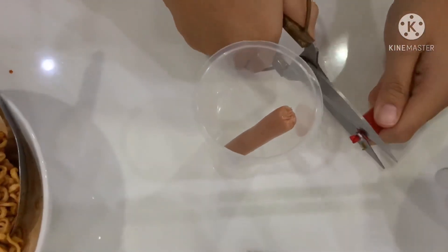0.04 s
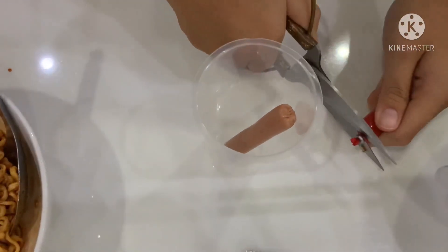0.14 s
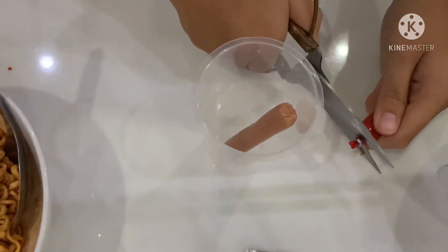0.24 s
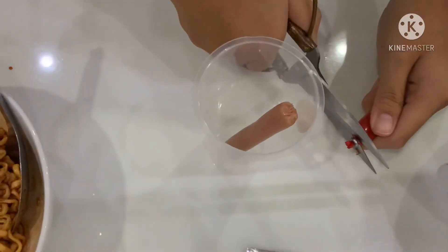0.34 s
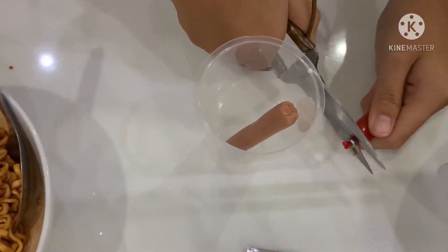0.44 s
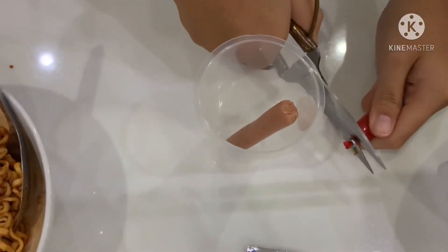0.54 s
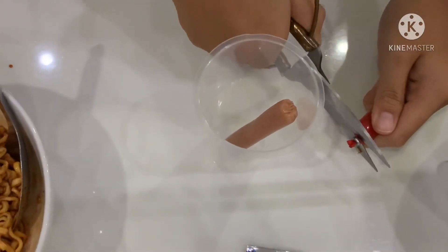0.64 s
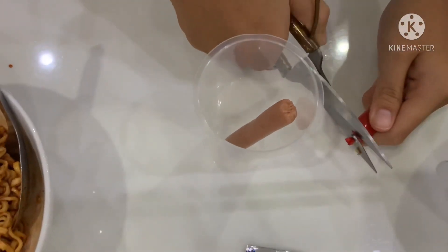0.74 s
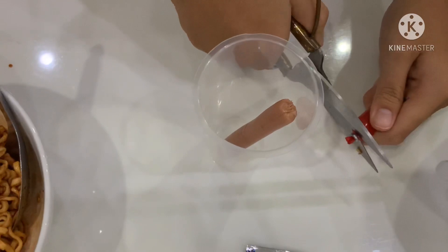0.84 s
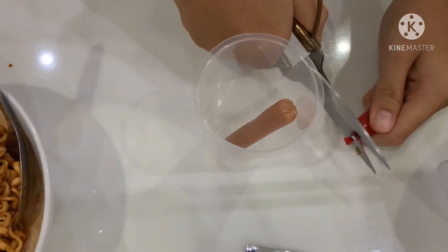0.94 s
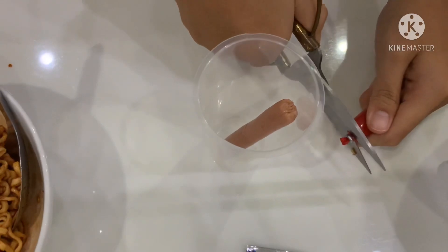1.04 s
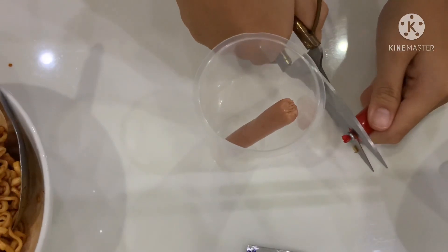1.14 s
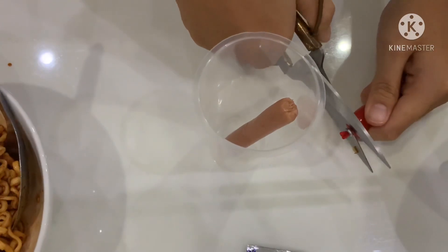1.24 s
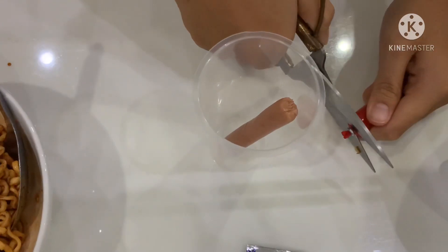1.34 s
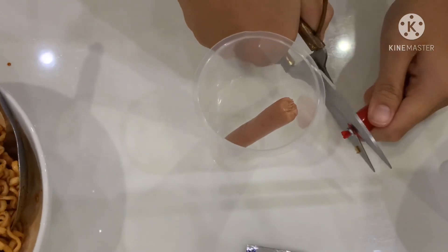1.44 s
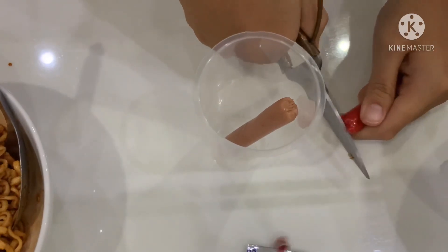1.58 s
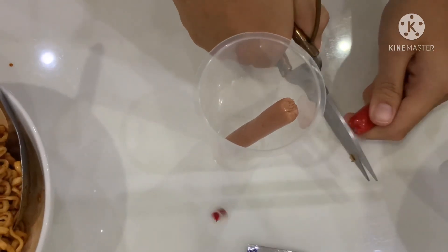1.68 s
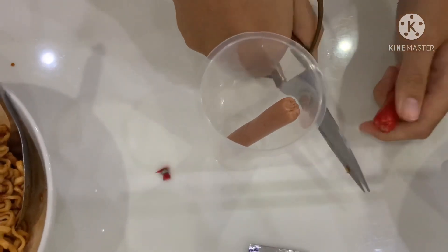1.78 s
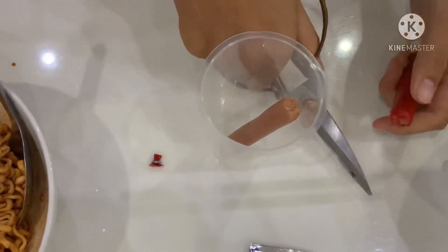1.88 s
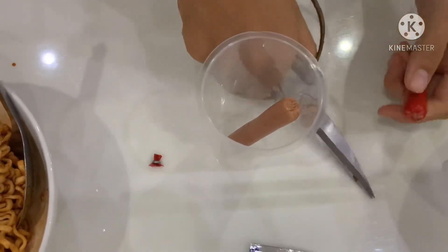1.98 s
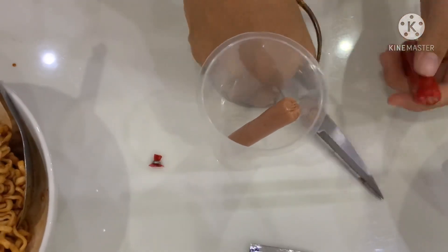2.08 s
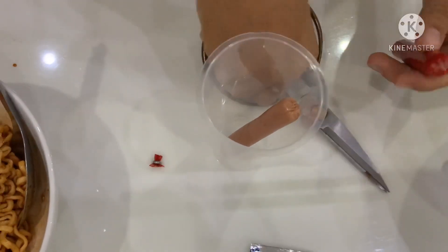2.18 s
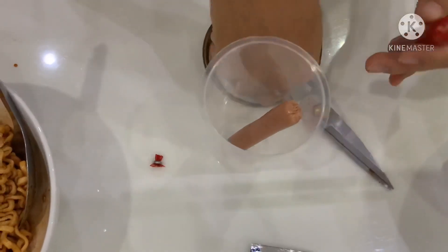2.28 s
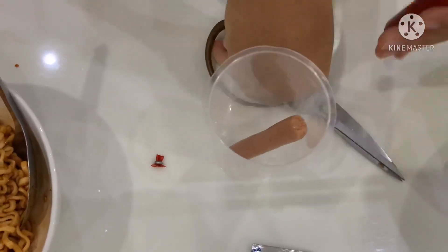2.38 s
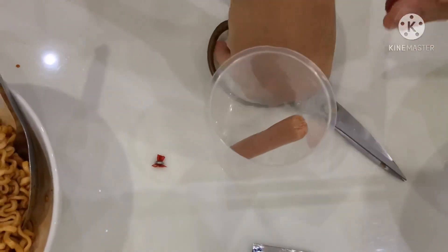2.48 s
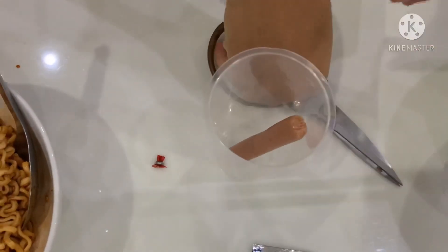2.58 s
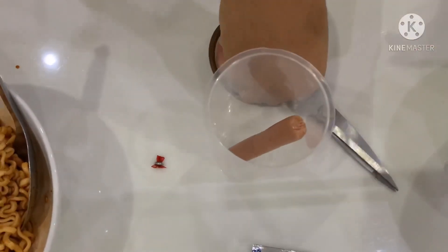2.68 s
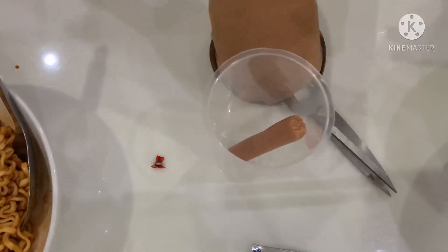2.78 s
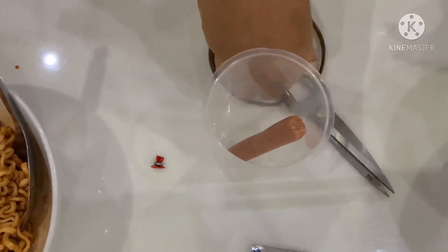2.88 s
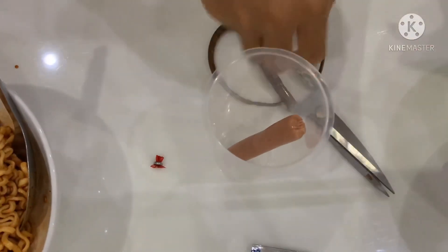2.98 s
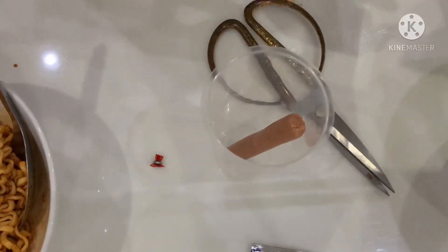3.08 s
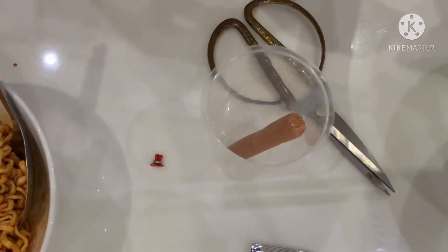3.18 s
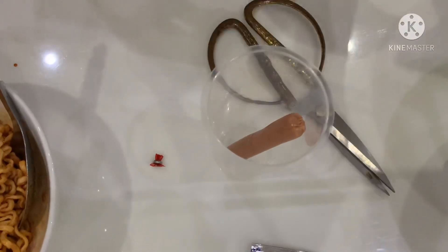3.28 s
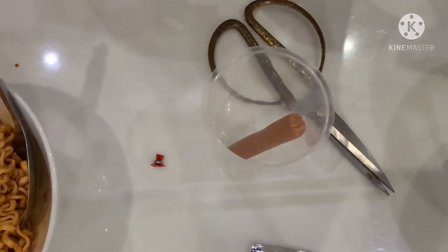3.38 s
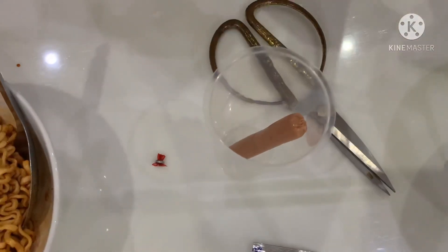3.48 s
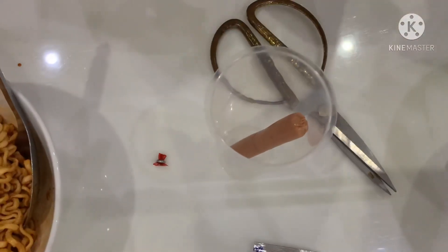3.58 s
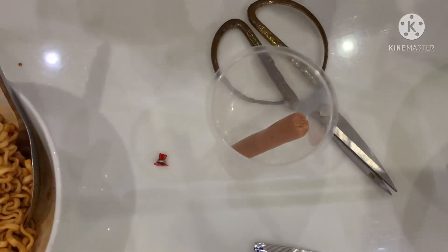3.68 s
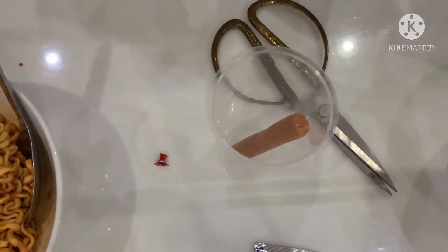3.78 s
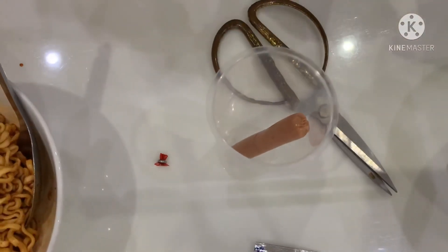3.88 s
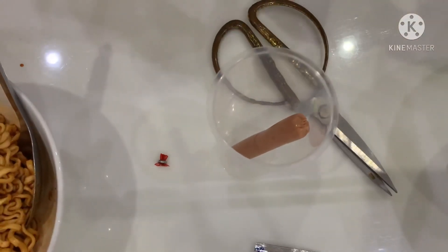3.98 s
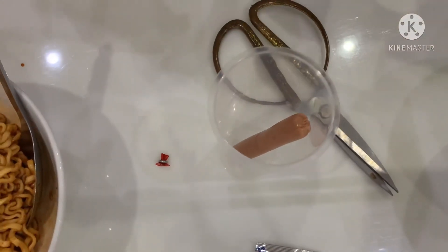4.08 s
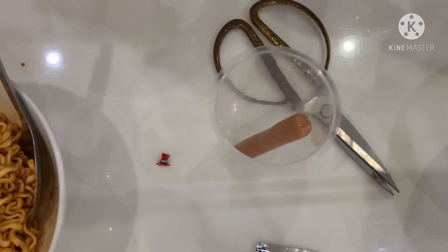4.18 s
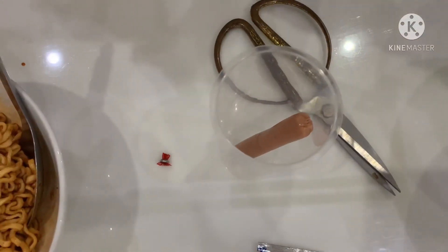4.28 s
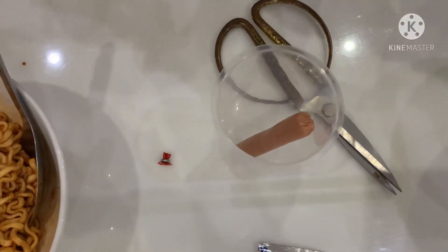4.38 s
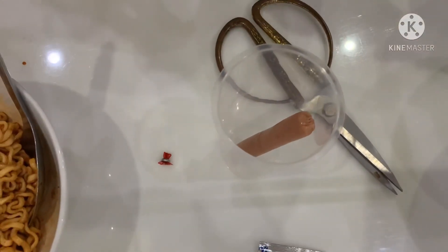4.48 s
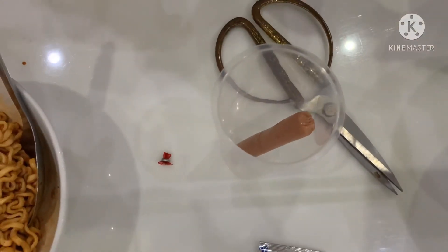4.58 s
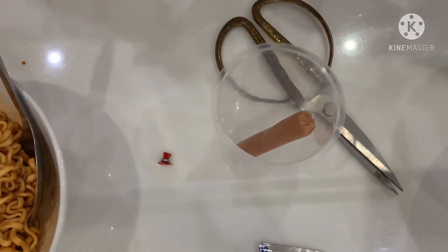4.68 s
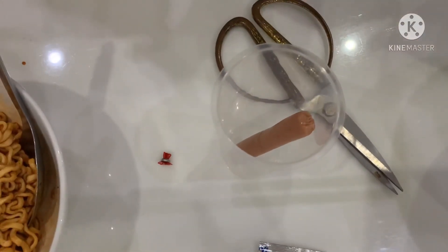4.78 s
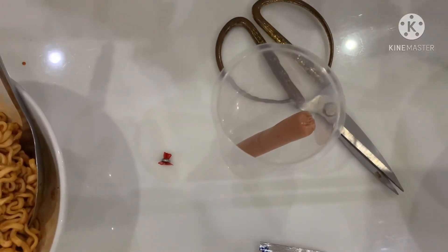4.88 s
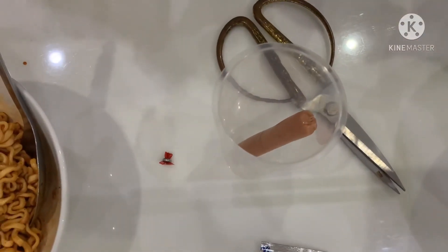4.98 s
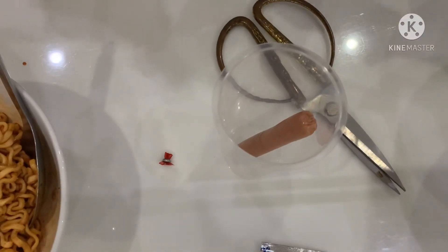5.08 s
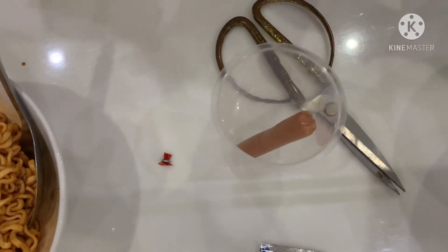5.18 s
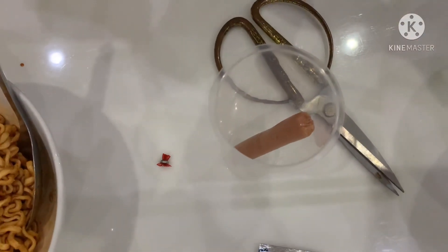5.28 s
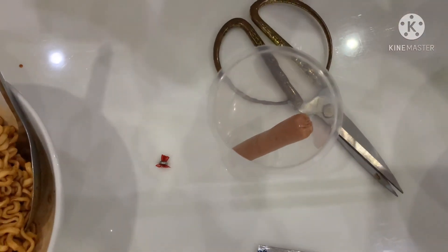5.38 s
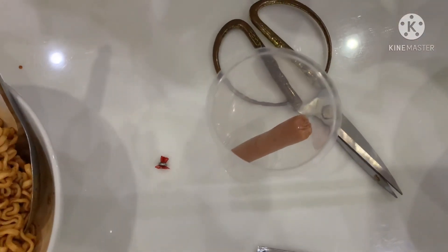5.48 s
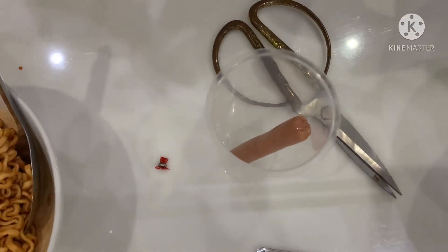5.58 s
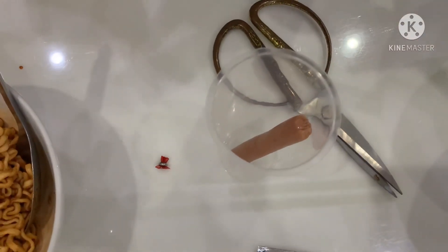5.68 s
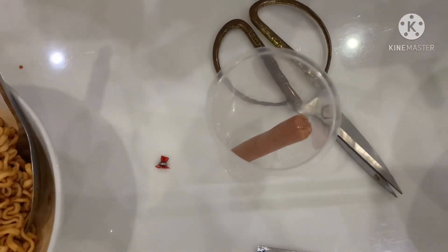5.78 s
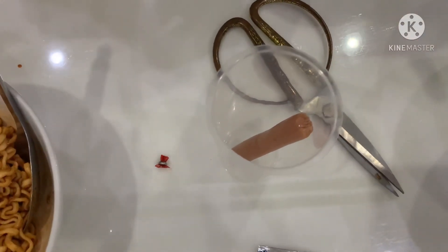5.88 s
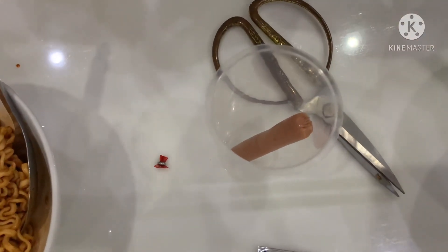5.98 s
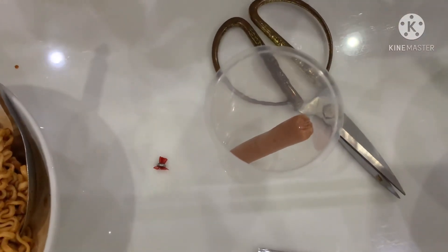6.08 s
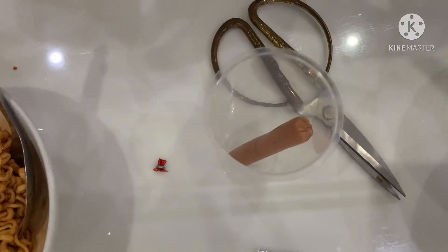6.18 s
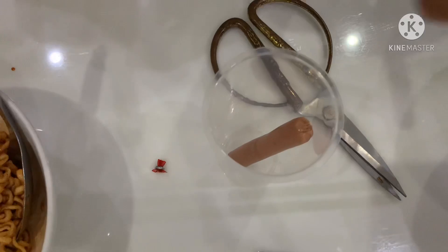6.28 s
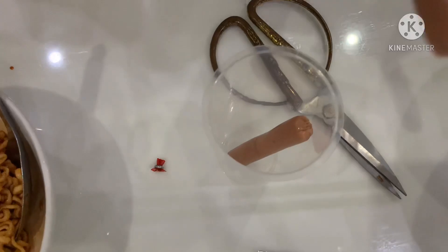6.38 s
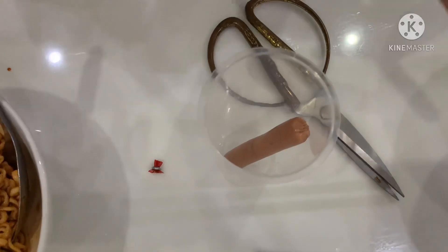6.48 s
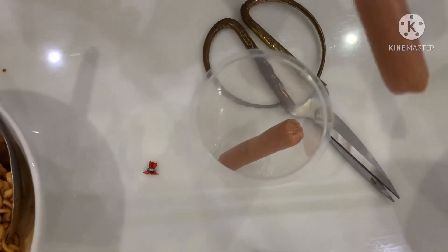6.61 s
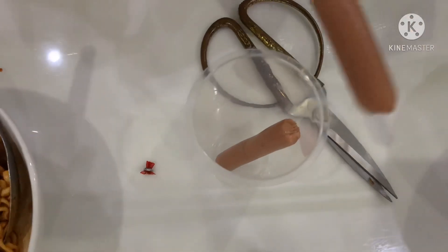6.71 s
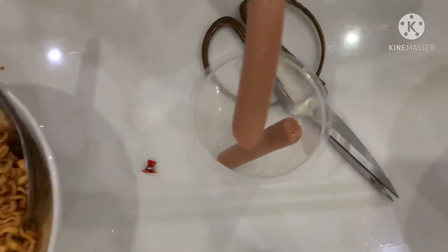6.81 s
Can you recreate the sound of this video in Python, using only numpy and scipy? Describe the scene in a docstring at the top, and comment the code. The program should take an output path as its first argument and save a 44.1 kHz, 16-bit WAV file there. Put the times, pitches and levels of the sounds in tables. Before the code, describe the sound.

Scissors shear a plastic sausage casing and snap shut, clatter loudly onto a stone table, then thin plastic wrapper crackles softly over an appliance hum.

```python
"""First an appliance hum and small close taps in a hard room, then a plastic wrapper rustling and crackling nearby.
Close to the microphone, steel scissors shear a plastic sausage casing, snap shut, touch the stone table, then
are dropped on it and clatter. Steel and stone are decaying modes with noise cracks; casing and wrapper are
coloured noise; sparse reflections make the room. Air, fan tones, hum and a rumble lie behind."""
import sys
import numpy as np
from scipy import signal
from scipy.fft import rfft, irfft, next_fast_len
from scipy.io import wavfile
from scipy.ndimage import uniform_filter1d

SR = 44100
rng = np.random.default_rng(int(sys.argv[2]) if len(sys.argv) > 2 else 0)


def transcribe(signal):
    """Save signal, clipped to [-1, 1], as a 16-bit WAV file at the path in sys.argv[1]."""
    frames = np.atleast_2d(signal).T
    limited = np.clip(frames, -1, 1)
    pcm = np.round(limited * 32767).astype(np.int16)
    wavfile.write(sys.argv[1], SR, pcm)


N = 301883  # samples


def scissors():
    """Steel close to the microphone: shearing, snips, the snap, then blades meeting the stone."""
    return shearing() + snips() + snap() + chatter() + clatter()


# Blades shearing the casing: t/s, level/dB
SHEAR_LEVEL = [(1.512, -58), (1.516, -47.5), (1.52, -26.5), (1.533, -39.5), (1.545, -58.5), (1.6, -56)]
# Spectrum of the shearing: f/Hz, relative level/dB per Hz
SHEAR_SPECTRUM = [(410, -53), (700, -19), (3240, -4.5), (4430, -4), (4730, -3), (5400, -12.5), (8530, -15),
                  (13900, -12), (16000, -21.5)]


def shearing():
    """Sliding edges make a continuous coloured noise under a level curve."""
    out = np.zeros(N)
    add(out, *played(SHEAR_LEVEL, lambda n: shaped(rng.standard_normal(n), SHEAR_SPECTRUM)))
    return out


# Casing fibres parting: t/s, relative level/dB, centre f/Hz, width/octaves, treble skirt/dB, t60/s
FIBRE_SNIPS = [(1.551, -29.5, 1290, 0.91, -21, 0.05), (1.6156, -18, 4080, 0.34, -37, 0.01215),
               (1.6273, -18, 3700, 0.38, -54, .012), (1.6462, -21.5, 4290, .3, -26, .016),
               (1.7166, -19.5, 5557, 4.6, -32, .009), (1.751, -29.5, 9000, 1.477, -2, 0.011),
               (1.762, -36, 10000, 1.1, -14, .009), (1.799, -44, 9000, 1.2, -18, 0.0068),
               (1.8238, -29.5, 13500, 0.61, -7, .009)]


def snips():
    """Each parting fibre is a tiny snap of noise."""
    out = np.zeros(N)
    for s, *row in FIBRE_SNIPS:
        add(out, s, tick(*row))
    return out


# The blades close: t/s, relative level/dB
BLADE_SNAP = [(1.8664, -5)]
# Modes of the scissors held in the air: f/Hz, relative level/dB, t60/s
HELD_MODES = [(1953, -17.5, 0.024), (2800, -17.5, 0.035), (4370, -4, .008), (4900, -4.5, .008),
              (7040, -5, 0.028), (7400, -4.5, .012), (8000, -7, .008), (9200, 2.5, 0.016),
              (10600, 7.5, 0.021), (10790, -27.5, 0.7), (11400, -4.5, .01), (13510, -4.5, 0.0092),
              (15170, 5, 0.02)]


def snap():
    """Closing blades ring at their modes, with a bright puff of contact noise."""
    out = np.zeros(N)
    for s, db in BLADE_SNAP:
        add(out, s, amp(db - 10.5) * ring(HELD_MODES, spread_db=0, detune=0))
        contact = burst(0.017, [(1200, -41.5), (2200, -13), (7500, 13), (16000, 4)])
        add(out, s, amp(db - 16.5) * contact)
    return out


# Loose blades on the stone between the blows: t/s, level/dB
CHATTER_LEVEL = [(2.786, -29.5), (2.84, -23), (2.9, -36.5), (2.93, -36.5), (2.94, -24), (2.99, -34.5),
                 (3.04, -67)]
# Spectrum of the chatter: f/Hz, relative level/dB per Hz
CHATTER_SPECTRUM = [(180, -45), (300, -10), (701, -6), (930, -6), (1720, -9.5), (3130, -6.5), (8220, -23.5),
                    (13100, -25), (16000, -32)]


def chatter():
    """Loose blades chatter as grainy coloured noise."""
    out = np.zeros(N)
    add(out, *played(CHATTER_LEVEL, lambda n: shaped(grains(n, 5.2), CHATTER_SPECTRUM)))
    return out


# Blows on the table: t/s, blow level/dB, then relative: table thud/dB, handles/dB, brightness/dB, ring/dB
BLOWS = [(1.991, -19.5, -5, -3.5, -7.5, -13.5), (2.0187, -23, -3, -11.5, -0.5, -12.5),
         (2.036, -20.5, -19.5, 0, -2.5, -20), (2.0519, -35.5, -16, -7.5, -19, -2),
         (2.7857, -18, -17, -9.5, -15, -9.5), (2.7959, -10, -4, -20.5, -12.5, -6.5),
         (2.8032, -15.5, -14.5, -6, -5, -9.5), (2.8124, -9.5, -9.5, -8.5, 6.5, -14),
         (2.8215, -35.5, -2, -8, -7, -17.5), (2.8357, -16, -16, 3, -9.5, -15.5),
         (2.8432, -10, -26, -4, -4, -17.5), (2.863, -23.5, -15.5, -5.5, -8.5, -13.5),
         (2.881, -33.5, 13.5, 7.5, 13, -11.5), (2.8985, -41, -5, 15.5, 13, -15),
         (2.9322, -2.5, -15, -18.5, 0.5, -15.5), (2.9468, -14, -7, -13.5, -5.5, -16.5),
         (2.965, -15, -7.5, -3, -14, -25)]


def clatter():
    """The scissors touch the table, then drop and bounce: one knock for each contact."""
    out = np.zeros(N)
    for s, *row in BLOWS:
        add(out, s, knock(*row))
    return out


# Modes of the scissors against the stone: nominal f/Hz, relative level/dB, t60/s
LYING_MODES = [(539.5, 4.5, 0.032), (772, -10.5, 0.06), (850, -8, 0.084), (942, -4, 0.05),
               (1002, -10.5, .05), (1234, -15.5, 0.094), (1395, -13.5, 0.08), (1842, 0, 0.038),
               (2030, -4.5, 0.022), (2210, -4, 0.047), (3090, 4, 0.045), (3425, 0, 0.03), (3630, -0.5, .03),
               (3947, -3.5, 0.063), (4306, -3, 0.059), (4830, -6, 0.055), (5430, -7, 0.085),
               (6620, -7, 0.12), (6980, -3.5, 0.048), (7430, -12.5, .1), (8980, -17.5, 0.25),
               (10250, -20, .25), (10720, -6.5, 0.03), (11350, -3.5, 0.03), (11770, -17.5, .25),
               (12750, 2.5, 0.028), (12720, -18, .25), (13850, -3, .02), (15200, -0.5, .04),
               (14500, -21, 0.25)]
# Modes of the table top: nominal f/Hz, relative level/dB, t60/s
TABLE_MODES = [(62, -18.5, 0.11), (109.6, 3.5, 0.04), (185.7, -9.5, 0.34), (285, -4, 0.059),
               (388.7, -3, 0.03)]
CRACK_T60_S = 0.026
BLADE_SHARE = 0.33  # the blades brighten less than their tips


def knock(db, thud_db, handles_db, bright_db, ring_db):
    """Contact crack, ringing steel damped by the stone, and the thud of the table."""
    colour = [(150, thud_db + 4.5), (400, handles_db - 10), (950, handles_db + 12), (3500, 0),
              (7300, BLADE_SHARE * bright_db + 3), (12500, bright_db + 3), (16500, bright_db + 3.5)]
    hz, weight_db = np.transpose(colour)
    mode_hz = np.array(LYING_MODES)[:, :1]
    choke_db = 1.3 * np.log2(mode_hz / 1000)  # the stone chokes high modes more
    steel = ring(LYING_MODES, np.interp(np.log(mode_hz), np.log(hz), weight_db) - choke_db)
    onset = 1 - np.exp(-np.arange(len(steel)) / SR / 0.003)  # the heavy top answers slowly
    table = ring(TABLE_MODES, spread_db=1.5) * onset
    out = amp(ring_db) * steel + amp(thud_db - 6.5) * table
    add(out, 0, amp(-6) * burst(CRACK_T60_S, colour))
    return amp(db) * out


def wrapper():
    """Plastic nearby, with taps close by: crackles, grainy rustle and faint rubbing whistles."""
    return taps() + crackles() + rustle() + rub() + squeak()


# Small taps close by: t/s, relative level/dB, centre f/Hz, width/octaves, treble skirt/dB, t60/s
CLOSE_TAPS = [(0.1121, -24, 990, 0.68, -30.5, 0.1), (0.1123, -28, 6470, 0.27, -54, 0.038),
              (.227, -41.5, 4900, 0.79, -26, 0.0091), (2.3, -36, 775, .2, -44.5, 0.044),
              (4.057, -35, 5220, 1.5, -14, 0.028), (4.625, -38, 5050, 0.74, -21, 0.077),
              (4.961, -30, 5800, 4.2, -14, 0.058), (5.304, -47, 3504, 0.78, -25, 0.029),
              (5.420, -40.5, 4200, 1, -26, 0.028), (5.95, -34.5, 2944, 0.33, -53, 0.017)]


def taps():
    """Each tap is a short puff of noise around one broad resonance."""
    out = np.zeros(N)
    for s, *row in CLOSE_TAPS:
        add(out, s, tick(*row))
    return out


# Distinct wrapper crackles: t/s, relative level/dB, centre f/Hz
WRAPPER_CRACKLES = [(1.377, -49.5, 11040), (3.4815, -42, 14900), (3.596, -53, 7120), (3.655, -46, 7340),
                    (3.8546, -51, 15000), (3.9666, -49.5, 9670), (4.2018, -51, 11000),
                    (4.4707, -52.5, 9100), (4.4836, -47, 8990), (4.5516, -52, 10100), (4.6628, -47, 7196),
                    (5.0499, -46, 10400), (5.1165, -45, 7350), (5.257, -44.5, 13600), (5.4774, -44, 12600),
                    (5.51, -42, 10050), (5.8664, -55, 13330), (6.0555, -43, 9700), (6.0693, -42, 13100),
                    (6.284, -39, 12750), (6.372, -49, 9060), (6.4815, -47, 12550), (6.525, -38.5, 8840),
                    (6.6794, -53, 11600), (6.6954, -50, 9610)]
# Shape of every crackle: width/octaves, treble skirt/dB, t60/s
CRACKLE_SHAPE = (2.3, -16, .015)
FAINT_PER_S, FAINT_FROM_S = 4, 3.5  # faint crackles at random once the wrapper is being peeled
FAINT_DB = -58  # lowest relative level


def crackles():
    """Each crackle is a tiny wide-band snap; faint ones fall at random in even time slots."""
    out = np.zeros(N)
    for s, *row in WRAPPER_CRACKLES:
        add(out, s, tick(*row, *CRACKLE_SHAPE))
    for k, (late, size, pitch) in enumerate(rng.random((14, 3))):
        faint = tick(FAINT_DB + 5 * size, 7000 * 2 ** pitch, *CRACKLE_SHAPE)
        add(out, FAINT_FROM_S + (k + late) / FAINT_PER_S, faint)
    return out


# Fingers and wrapper rustling: peak t/s, peak level/dB, rise/s, fall/s
RUSTLES = [(.2, -72, 0.086, 0.32), (.734, -64, 0.034, .08), (1.046, -64, .045, 0.065),
           (1.214, -55, 0.075, 0.25), (1.497, -63, 0.12, 0.085), (1.864, -48.5, .05, .01),
           (2.354, -59, 0.17, .11), (2.6, -73.5, .04, 0.25), (3.5, -72, 0.044, .1), (3.675, -65, .07, .04),
           (4.062, -56, .006, 0.048), (4.119, -68, .08, .4), (4.49, -59, .045, 0.046),
           (4.63, -61, 0.033, .07), (4.959, -43, 0.013, .05), (5.001, -63.5, 0.083, .5),
           (5.27, -65.5, .5, .15), (5.421, -64, .15, .1), (5.52, -61, 0.13, 0.11),
           (5.67, -69.5, 0.13, 0.48), (6.07, -63.5, .13, .07), (6.28, -64, 0.021, .2), (6.4, -69, .2, 0.13),
           (6.48, -66, 0.033, .2), (6.53, -63, 0.025, 0.09), (6.84, -69, 0.43, .05)]
# Steady handling under the rustles, running past the end: from t/s, to t/s, level/dB
HANDLING = (2.7, 9.5, -81)
# Spectrum of both: f/Hz, relative level/dB per Hz
RUSTLE_SPECTRUM = [(1500, -30.5), (2500, -1.5), (4500, 1.5), (7000, -2.5), (10000, -4.5), (13500, -4.5),
                   (16000, -8.5)]


def rustle():
    """Moving plastic is grainy coloured noise, swelling with each gesture over steady handling."""
    out = np.zeros(N)
    for rows in [swell(*row) for row in RUSTLES] + [held(*HANDLING)]:
        add(out, *played(rows, lambda n: shaped(grains(n, 1.7), RUSTLE_SPECTRUM)))
    return out


# Plastic rubbed until it whistles: peak t/s, peak level/dB, rise/s, fall/s, tilt/dB per octave
RUBS = [(4.066, -52.5, .006, .02, -3), (4.111, -57, 0.054, 0.36, 0), (4.31, -51.5, 0.19, .11, -3),
        (4.39, -56.5, .2, .25, -23), (4.88, -64, 0.046, 0.23, 33), (4.95, -53, 0.091, 0.012, 12)]
# Resonances of the rubbed plastic: f/Hz, width/Hz, relative level/dB before the tilt
RUB_PEAKS = [(2940, 380, -1.5), (4310, 110, 3), (5220, 58, 1.5), (6700, 550, -7.5)]


def rub():
    """Rubbed plastic whistles faintly: narrow noise bands with an unsteady level."""
    out = np.zeros(N)
    for *row, tilt_db in RUBS:
        def whistling(n):
            return rubbing(n, RUB_PEAKS, tilt_db) * amp(2.2 * wander(n, 300))
        add(out, *played(swell(*row), whistling))
    return out


# A thin whistle grows at the end: t/s, level/dB
SQUEAK_LEVEL = [(6.7, -70), (6.77, -65.5), (6.85, -52.5)]
# Resonances of the whistle: f/Hz, width/Hz, relative level/dB
SQUEAK_PEAKS = [(1690, 380, 6), (8250, 230, -4), (11000, 800, -11.5), (13000, 150, -12)]


def squeak():
    """Narrow noise bands under a growing level curve."""
    out = np.zeros(N)
    add(out, *played(SQUEAK_LEVEL, lambda n: rubbing(n, SQUEAK_PEAKS)))
    return out


# The hard room: f/Hz, reflection level/dB, t60/s
ROOM_BANDS = [(150, -6, 1), (500, -3.5, 0.95), (1200, -7, 0.94), (4100, -15.5, 1), (8000, -15, 0.85),
              (12000, -16, 0.57), (16000, -17, 0.44)]


def room(x):
    """Sparse reflections of random sign, each band with its own strength and dying at its own speed."""
    echoes = np.zeros(SR)
    at = np.arange(400, SR - 20, 12)
    echoes[at + rng.integers(0, 12, len(at))] = rng.choice([-1., 1.], len(at))
    hz, t, z = signal.stft(echoes, SR, nperseg=256)
    f, db, t60 = np.transpose(ROOM_BANDS)
    db, t60 = (np.interp(np.log(hz + 1), np.log(f), c)[:, None] for c in (db, t60))
    z = z * amp(-60 * t / t60)
    flat = signal.istft(z, SR, nperseg=256)[1]
    tail = signal.istft(z * amp(db), SR, nperseg=256)[1]
    return signal.fftconvolve(x, tail / np.linalg.norm(flat))[:N]


def background():
    """What lies behind: room tone, fuzzy fan tones, a wavering hum and a low rumble."""
    return air() + fan() + hum() + rumble()


# Spectrum of the room tone: f/Hz, relative level/dB per Hz
AIR_SPECTRUM = [(25, -26.5), (60, -9), (118, -4), (266, -8), (389, -13.5), (650, -14), (1000, -26),
                (1730, -26.5), (2460, -31), (3900, -29.5), (4600, -45), (6300, -54.5), (8500, -56),
                (14000, -47), (16000, -65.5), (16500, -75)]
AIR_DB = -52.5


def air():
    """Room tone: steady coloured noise."""
    noise = rng.standard_normal(next_fast_len(N))
    return amp(AIR_DB) * evened(shaped(noise, AIR_SPECTRUM)[:N])


# Fuzzy fan tones: f/Hz, width/Hz, level/dB
FAN_TONES = [(211.3, 14, -59), (2112, 44, -63), (3740, 190, -75.5), (5576, 140, -71.5)]


def fan():
    """Each fan tone is noise in one narrow resonance."""
    return sum(amp(db) * whistle(N, hz, width) for hz, width, db in FAN_TONES)


# Appliance hum: t/s, mean f/Hz, level/dB
HUM_COURSE = [(0, 322, -51.5), (3.8, 321, -52.5), (4.0, 323, -57), (4.1, 322, -53.5), (4.8, 318, -56),
              (5.2, 321, -53.5), (6.845, 321, -53)]


def hum():
    """A sine whose level and pitch drift, with a small random pitch wobble."""
    s, *columns = np.transpose(HUM_COURSE)
    hz, db = (np.interp(np.arange(N) / SR, s, c) for c in columns)
    wobble_hz = 1.6 * wander(N, 3000)
    phase = 2 * np.pi * np.cumsum(hz + wobble_hz) / SR
    return amp(db) * np.sqrt(2) * np.sin(phase)


# A low rumble swells for a while: from t/s, to t/s, level/dB
RUMBLE_SPAN = (3.45, 5.3, -54.5)
# Spectrum of the rumble: f/Hz, relative level/dB per Hz
RUMBLE_SPECTRUM = [(30, 6), (70, -20), (280, 8.5), (450, -0.5), (800, -18.5), (1600, -17), (4000, -49)]
RUMBLE_WAVER_DB = 1.5  # rms


def rumble():
    """Low coloured noise with a slowly wavering level."""
    out = np.zeros(N)
    lumps = amp(RUMBLE_WAVER_DB * evened(uniform_filter1d(wander(N, 3000), 3000)))
    add(out, *played(held(*RUMBLE_SPAN),
                     lambda n: lumps[:n] * shaped(rng.standard_normal(n), RUMBLE_SPECTRUM)))
    return out


def amp(db):
    """Decibels to amplitude."""
    return 10 ** (np.asarray(db) / 20)


def evened(x):
    """Scales x to rms 1."""
    return x / np.sqrt(np.mean(x ** 2) + 1e-20)


def add(mix, s, sound):
    """Adds sound at s seconds, cut at the end of the mix."""
    part = mix[round(s * SR):][:len(sound)]
    part += sound[:len(part)]


def shaped(x, points):
    """Colours x by a spectrum of (Hz, dB) points."""
    hz, db = np.transpose(points)
    f = np.fft.rfftfreq(len(x), 1 / SR)
    return irfft(rfft(x) * amp(np.interp(np.log(f + 1), np.log(hz + 1), db)), len(x))


def played(rows, make):
    """Start time, and sound from make(samples) under a (s, dB) level curve."""
    s, db = np.transpose(rows)
    t = np.arange(s[0], s[-1], 1 / SR)
    level = amp(np.interp(t, s, db))
    return s[0], level * evened(make(len(t))) * signal.windows.tukey(len(t), .04)


def swell(peak, db, rise, fall, climb_db=30):
    """Level curve of one gesture: a straight climb in dB to its peak and a straight fall."""
    return [(peak - rise, db - climb_db), (peak, db), (peak + fall, db - climb_db)]


def held(start, end, db, ease=0.13):
    """Level curve that eases in, stays and eases out."""
    return [(start, db - 6), (start + ease, db), (end - ease, db), (end, db - 12)]


def wander(count, samples):
    """Random curve smoothed over a number of samples, rms 1."""
    return evened(uniform_filter1d(rng.standard_normal(count), samples))


def grains(count, depth_db):
    """Noise whose strength jumps every few milliseconds."""
    return rng.standard_normal(count) * amp(depth_db * wander(count, 150))


def whistle(count, hz, width):
    """Noise in one resonance, rms 1."""
    r = np.exp(-np.pi * width / SR)
    poles = [1, -2 * r * np.cos(2 * np.pi * hz / SR), r * r]
    return evened(signal.lfilter([1, 0, -1], poles, rng.standard_normal(count)))


def rubbing(count, peaks, tilt_db=0):
    """Noise in a few narrow resonances, leaning high or low."""
    return sum(amp(db + tilt_db * np.log2(hz / 4300)) * whistle(count, hz, width)
               for hz, width, db in peaks)


def ring(modes, weight_db=0, spread_db=2, detune=0.011):
    """Struck modes; each blow lands and rests elsewhere, so strengths and pitches vary."""
    hz, db, t60 = np.transpose(modes)[:, :, None]
    t = np.arange(SR // 2) / SR
    db = db + weight_db + spread_db * rng.standard_normal(hz.shape)
    looseness = np.minimum(0.053 / t60, 1)  # free ringing modes keep their pitch
    hz = hz * (1 + detune * looseness * rng.standard_normal(hz.shape))
    waves = np.sin(2 * np.pi * (hz * t + rng.random(hz.shape)))
    return (amp(db - 60 * t / t60) * waves).sum(0)


def burst(t60, colour, count=4096):
    """A coloured puff of noise that starts at once, at rms 1, and dies away."""
    fade = amp(-60 * np.arange(count) / SR / max(t60, .002))
    puff = shaped(rng.standard_normal(count), colour) * fade
    return puff * np.linalg.norm(fade) / np.linalg.norm(puff)


def tick(db, hz, octaves, skirt_db, t60):
    """A tiny snap: one broad resonance with a skirt of treble."""
    side = 2 ** octaves
    colour = [(hz / side ** 3, -34), (hz / side, -11), (hz, 0), (hz * side, -12),
              (hz * side * 4, skirt_db), (hz * side * 16, skirt_db - 20.5)]
    return amp(db - 8.5) * burst(t60, colour)


def scene():
    """Scissors and wrapper, their reflections in the room, and the background behind them."""
    near = scissors() + wrapper()
    return (near + room(near) + background())[None]


EDGE_HZ = 16300  # upper band limit


def record(dry):
    """The microphone loses the deepest bass and clips near full scale; then the band limit."""
    thin = signal.sosfilt(signal.butter(2, 50, "high", fs=SR, output="sos"), dry)
    capped = np.clip(thin, -.95, .95)
    lowpass = signal.firwin(255, EDGE_HZ, window=("kaiser", 11), fs=SR)
    return signal.oaconvolve(capped, lowpass[None], "same")


dry = scene()
out = record(dry)
transcribe(out)
```